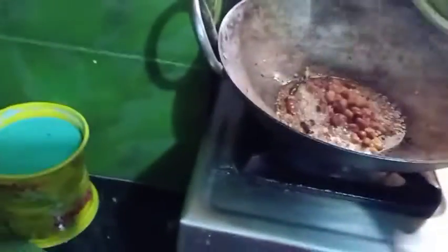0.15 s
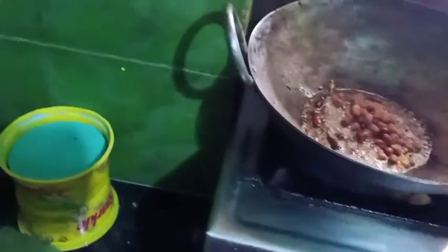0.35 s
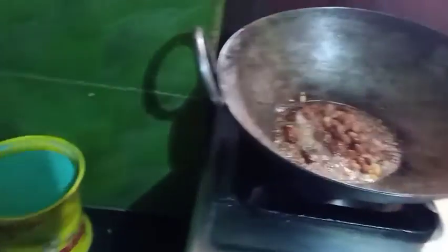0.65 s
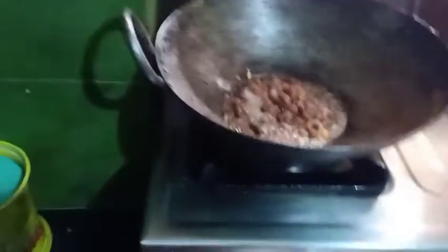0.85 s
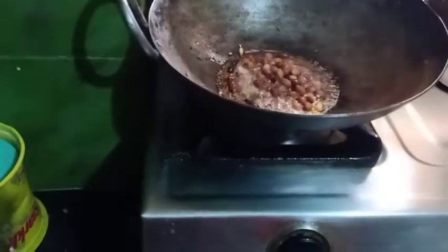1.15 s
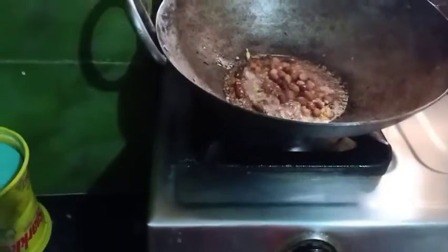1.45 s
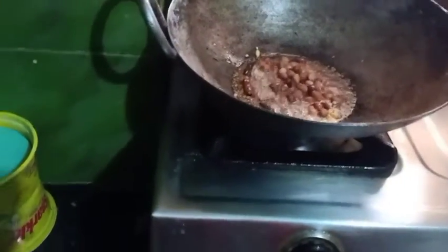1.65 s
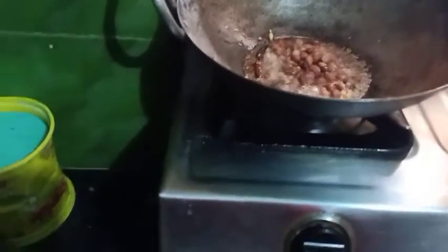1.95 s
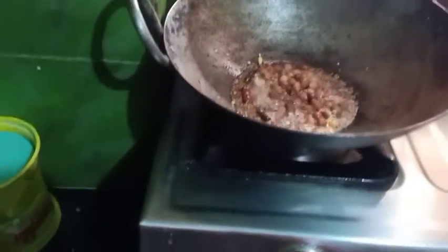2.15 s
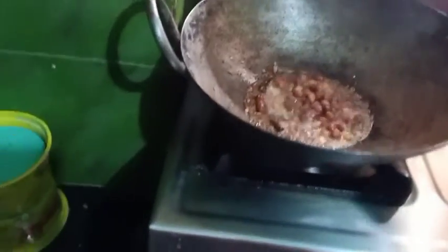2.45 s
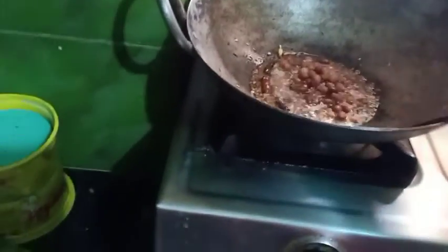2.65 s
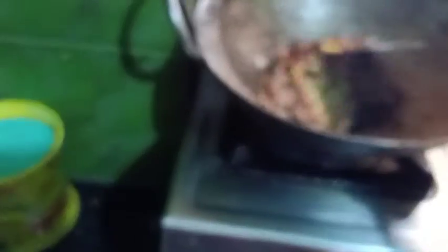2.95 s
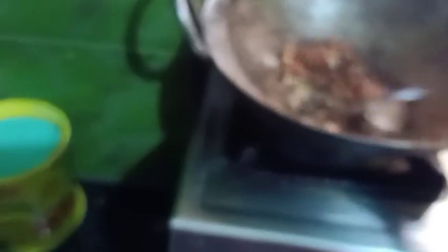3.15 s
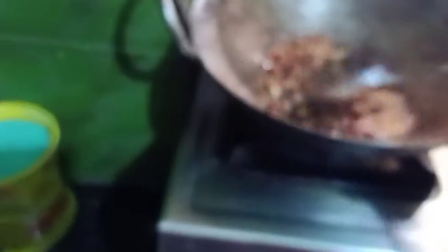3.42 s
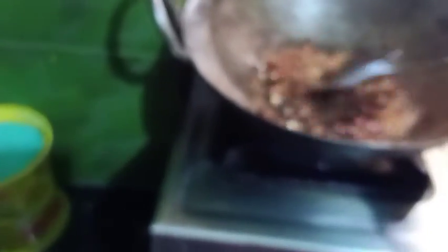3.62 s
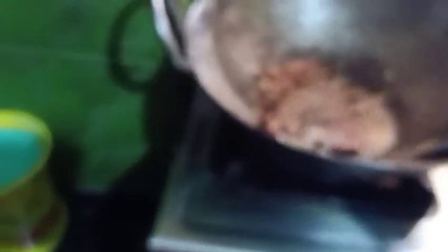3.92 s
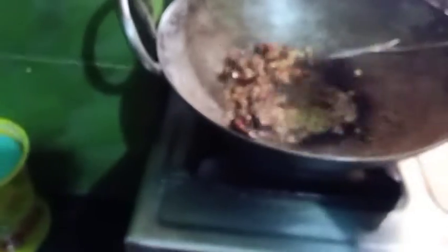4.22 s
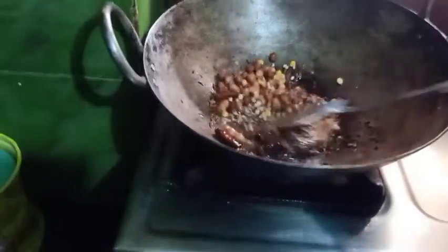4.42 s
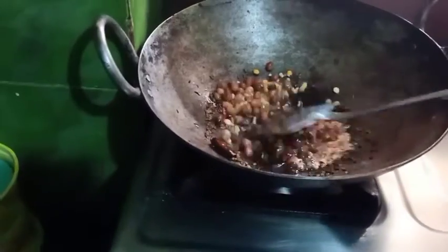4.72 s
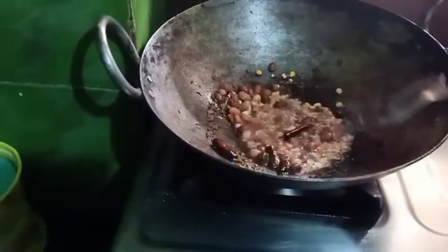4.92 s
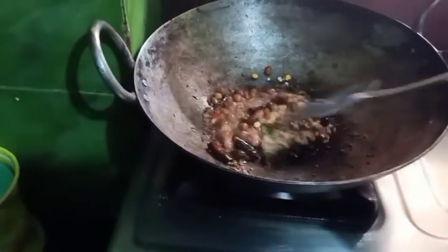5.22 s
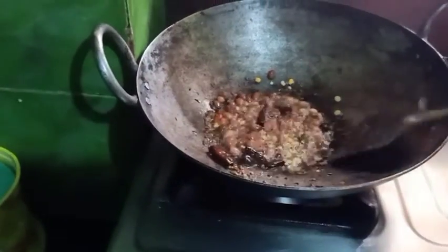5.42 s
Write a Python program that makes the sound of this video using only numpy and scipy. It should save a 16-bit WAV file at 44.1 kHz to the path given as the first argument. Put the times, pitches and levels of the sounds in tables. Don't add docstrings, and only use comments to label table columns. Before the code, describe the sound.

Steady fine sizzling and a low burner drone, with odd dry pops. About a second in, something metal drops on the counter and rattles to rest; the sizzle dips briefly. Then a steel blade taps the pan and turns the nuts, bringing bursts of hiss, dense crackling, hollow knocks and two late clanging strikes. Close stereo microphones, short hard room echo.

```python
import sys
import numpy as np
from scipy import signal
from scipy.fft import rfft, irfft, next_fast_len
from scipy.io import wavfile
from scipy.ndimage import uniform_filter1d, map_coordinates

SR = 44100
rng = np.random.default_rng(int(sys.argv[2]) if len(sys.argv) > 2 else 0)


def wav_record(signal):
    frames = np.transpose(np.atleast_2d(signal))
    bounded = np.clip(frames, -1, 1)
    quanta = np.round(bounded * 32767).astype(np.int16)
    wavfile.write(sys.argv[1], SR, quanta)


def nominal_scale(level):
    x = np.asarray(level, float) / 20
    return 10 ** x


N = 245637
BODY_HZ, SPRAY_HZ = 3520, 7920

# frequency_hz, density_db_per_hz
PORT = [(650, -36), (1100, -14), (1220, -8.5), (1360, -14.5), (1540, -12.5), (2220, -3.5), (2780, -5.5),
        (3210, -12), (4430, -8), (5420, 3.5), (5990, -2), (7570, -15), (10600, -21.5), (13700, -16.5),
        (15800, -26)]


def unit(x):
    return x / np.sqrt(np.mean(x ** 2) + 1e-20)


def along(points, hz):
    point_hz, value = np.transpose(points)
    return np.interp(np.log(hz + 1), np.log(point_hz + 1), value)


def curves(rows):
    s, *columns = np.transpose(rows)
    return [np.interp(np.arange(N) / SR, s, column) for column in columns]


def swells(rows):
    s, width, db = np.transpose(rows)[:, :, None]
    coarse = np.arange(0, N + 32, 32)
    level_db = np.sum(db * np.exp(-((coarse / SR - s) / width) ** 2), axis=0)
    return np.interp(np.arange(N), coarse, level_db)


def wobble(rate):
    coarse = np.arange(0, N + 32, 32)
    knots = rng.standard_normal(int(N * rate / SR) + 4)
    return np.interp(np.arange(N), coarse, map_coordinates(knots, [coarse * rate / SR]))


def filtered(x, response):
    size = next_fast_len(N + 8192)
    return irfft(rfft(x, size) * response(np.fft.rfftfreq(size, 1 / SR)), size)[..., :N]


def coloured(x, spectrum):
    magnitude = nominal_scale(along(spectrum, np.fft.rfftfreq(4096, 1 / SR)))
    cepstrum = irfft(np.log(magnitude + 1e-6))
    cepstrum[1:2048] *= 2
    cepstrum[2049:] = 0
    impulse = irfft(np.exp(rfft(cepstrum)))[:2048]
    return signal.fftconvolve(x, impulse[None] / np.linalg.norm(impulse), axes=1)[:, :N]


def bands(x):
    def passed(y, edge_hz, kind):
        return signal.sosfilt(signal.butter(4, edge_hz, kind, fs=SR, output="sos"), y)

    body = passed(x, BODY_HZ, "low")
    hiss = passed(passed(x, SPRAY_HZ, "low"), BODY_HZ, "high")
    return body, hiss, passed(x, SPRAY_HZ, "high")


def pair(a, b):
    # frequency_hz, likeness (0 to 1)
    alike = [(60, 0.81), (180, 0.96), (550, 0.65), (1650, 0.62), (4970, 0.11), (15000, 0.02)]

    def mid_and_side(hz):
        turn = np.arccos(np.clip(along(alike, hz), 0, 1)) / 2
        return np.array([np.cos(turn), np.sin(turn)])

    mid, side = filtered(np.array([a, b]), mid_and_side)
    return np.array([mid + side, mid - side])


def pair_noise(size):
    shared, left, right = rng.standard_normal((3, size))
    return shared + 0.46 * np.array([left, right])


def add(into, s, sound):
    at = round(s * SR)
    into[..., at:at + sound.shape[-1]] += sound[..., :N - at]


def ring(modes, t, bright_db):
    hz, db, t60 = np.transpose(modes)[:, :, None]
    level_luck, phase_luck = rng.standard_normal((2, 2, len(modes), 1))
    slow = uniform_filter1d(rng.standard_normal((len(modes), len(t))), size=200)
    flutter = 1 + 0.64 * unit(slow)
    level_db = db + 3 * level_luck + bright_db * (hz > BODY_HZ) - 60 * t / t60
    tone = np.sin(2 * np.pi * hz * t + hz / 3000 * phase_luck)
    attack = 1 - np.exp(-t / 0.0014)
    return np.sum(nominal_scale(level_db) * flutter * tone, axis=1) * attack


def glide(rows):
    out = np.zeros(N)
    for s, length, first_hz, last_hz, db in rows:
        size = round(length * SR)
        phase = 2 * np.pi * np.cumsum(np.linspace(first_hz, last_hz, size)) / SR
        add(out, s, nominal_scale(db) * np.hanning(size) ** 2 * np.sin(phase))
    return nominal_scale(wobble(79)) * out


def kitchen(x):
    # frequency_hz, t60_s
    room_decay = [(200, 0.45), (2000, 0.25), (6000, 0.35), (14000, 0.36)]
    hz, t, z = signal.stft(rng.standard_normal((2, SR // 3)), SR, nperseg=256)
    decay_db = -60 * t / along(room_decay, hz)[:, None]
    tail = signal.istft(z * nominal_scale(decay_db), SR, nperseg=256)[1]
    delayed = np.pad(x, ((0, 0), (250, 0)))
    return signal.fftconvolve(delayed, tail / np.linalg.norm(tail[0]), axes=1)[:, :N]


def patchy(x, patchy_db):
    z = signal.stft(x, nperseg=256)[2]
    field = uniform_filter1d(rng.standard_normal(z.shape[1:]), size=4, axis=0)
    field = uniform_filter1d(field, size=3, axis=1)
    return signal.istft(z * nominal_scale(patchy_db * unit(field)), nperseg=256)[1][:, :N]


def crackle(per_s, spread_db, bed_db):
    sizes = nominal_scale(spread_db * np.minimum(rng.exponential(size=(2, N)), 3))
    happens = rng.random((2, N)) < per_s / SR * nominal_scale(4 * wobble(25))
    middle, aside = happens * sizes * np.sign(rng.standard_normal((2, N)))
    both = unit(middle + 0.63 * np.array([aside, -np.roll(aside, 31)]))
    both[1] = np.roll(both[1], -3)
    bed = nominal_scale(bed_db) * rng.standard_normal((2, N))
    return coloured(patchy(both + 1.29 * kitchen(both) + bed, patchy_db=3.0), PORT)


def ducking():
    t = np.maximum(np.arange(N) / SR - 1.345, 0)
    fall_s, back_s = 0.056, 0.32
    return -8.5 * (1 - np.exp(-t / fall_s)) * np.exp(-t / back_s)


def frying():
    # time_s, sizzle_db, pressure_db
    boil = [(0.0, -52.5, 0.5), (0.43, -57, 1.5), (0.99, -55.5, 2.5), (1.23, -57, -6), (1.39, -57, 5),
            (1.7, -57.5, -3), (2.2, -56.5, 0), (2.76, -58.5, 0), (2.89, -48, 9), (2.97, -51, 3),
            (3.26, -44, 4), (3.54, -40, -0.5), (3.8, -41.5, -1.5), (4.11, -41, 0), (4.27, -43, -2),
            (4.72, -36.5, 2.5), (4.97, -40.5, -4.5), (5.57, -45.5, 1)]
    # centre_s, width_s, level_db
    surges = [(3.428, 0.0082, 0), (3.5, 0.014, -4), (3.548, 0.026, 5.5), (3.605, .012, -4),
              (3.65, 0.015, 3.5), (3.92, 0.028, 0.5), (4.03, 0.019, -1.5), (4.14, .03, 1.5),
              (4.28, .02, 0.5), (4.32, 0.011, 4.5), (4.385, 0.012, 0), (4.645, .012, -1),
              (4.712, 0.0083, 1), (4.735, 0.013, -4), (4.76, 0.0083, 6.5), (4.89, 0.012, 1),
              (5.03, 0.017, -4.5), (5.08, 0.0079, -13), (5.4, 0.017, 0)]
    # centre_s, width_s, level_db
    splashes = [
        (.76, 0.16, 4),
        (1.7, 0.035, 9.5),
        (3.36, 0.099, 6),
        (4.11, 0.04, 0),
        (4.54, 0.0097, 9),
        (4.93, 0.061, 4),
    ]
    # frequency_hz, density_db_per_hz
    drone_colour = [(82, -32.5), (140, -17.5), (172, 0), (204, -8.5), (237, 1.5), (339, -4.5), (434, 0.5),
                    (567, -5), (764, 2.5), (950, -3.5), (1500, -15), (1950, -44), (3300, -120)]
    # frequency_hz, density_db_per_hz
    hand_colour = [(15, -41), (25, -20), (64, 9), (140, 3), (180, -7), (310, -120)]

    sizzle_db, press_db = curves(boil)
    lively = sizzle_db + 55
    surge_db = swells(surges)

    body = unit(bands(crackle(per_s=500., spread_db=2.5, bed_db=-1.0))[0])
    _, hiss, spray = bands(crackle(per_s=700., spread_db=5.5, bed_db=-6.))
    scrape_db = -60 + 0.97 * lively + 0.57 * press_db
    spray_db = -69 + 1.14 * lively + swells(splashes) - 0.98 * surge_db + 0.73 + 2.1 * wobble(30)
    oil = nominal_scale(scrape_db) * body + nominal_scale(sizzle_db) * unit(hiss) + nominal_scale(spray_db) * unit(spray)
    oil *= nominal_scale(0.92 * wobble(11) + 0.47 * wobble(120) + surge_db + 2.0)

    hum = unit(filtered(rng.standard_normal(N), lambda hz: 1 / (1 + (2 * (hz - 750) / 14) ** 2)))
    hum_db = -72.5 + 0.79 * lively + 4.3 * wobble(18)

    drone = unit(coloured(pair(*rng.standard_normal((2, N))), drone_colour))
    drone_db = -62.5 + 0.29 * lively + press_db + 2.24 * wobble(17)

    hand = unit(coloured(pair(*rng.standard_normal((2, N))), hand_colour))
    hand_db = -77 + 0.099 * lively + swells([(0.87, 0.11, 14)])
    return nominal_scale(ducking()) * (oil + nominal_scale(hum_db) * hum + nominal_scale(drone_db) * drone + nominal_scale(hand_db) * hand)


def pops():
    # start_s, peak_db, weight_db
    dry_pops = [(0.0705, -30, -10), (0.1258, -26, -37), (0.1905, -30, -19), (0.2166, -24, -14),
                (0.2293, -36, -26), (0.312, -30.5, -27), (0.463, -31, -4), (0.5491, -16, 1),
                (0.7068, -53, -25), (0.9518, -23.5, -8), (1.7512, -35, 0), (1.8584, -25, -2),
                (1.9982, -43, 8), (2.0438, -40, 5), (2.0992, -29, -38), (2.18, -32, -22),
                (2.2217, -29, 3.8), (2.2898, -38, -17), (2.3395, -39, -18), (2.4204, -29.5, 2)]
    ticks = [(3.0543, -22, 1), (3.4212, -17, -17), (3.4652, -16.5, -2.5), (3.58, -25, 10.5),
             (3.9378, -23, 9.5), (3.725, -33, -13), (3.8, -31.5, 10.5), (3.828, -36, 16), (4.1684, -22, 0),
             (4.186, -18, -23), (4.3068, -25, -6), (4.3163, -21.5, -18), (4.3618, -23.5, 4),
             (4.455, -17, -7), (4.481, -21, 8), (4.7622, -19.5, 4), (4.7898, -18, -27), (4.9078, -20.5, 1),
             (4.9487, -25, 6), (5.0535, -18, -17), (5.0906, -22, 3), (5.175, -17, -5), (5.1885, -17.5, 1),
             (5.2208, -16, -5), (5.262, -20.5, -4), (5.2822, -18.5, -13)]
    spits = [(0.2695, -29.5, -2), (0.3582, -22.5, -13), (0.733, -37, -21), (1.4675, -37, -16),
             (1.9403, -29, -11), (2.5875, -39, -17), (2.9938, -30, 9.5), (3.2662, -35.5, 18.5),
             (3.3127, -26, -5), (3.355, -26, -4), (3.629, -18, -13), (3.6626, -23.5, 11.5),
             (3.9891, -13, -1), (4.2249, -19, -5), (4.2704, -27.5, 3), (4.525, -27, -8), (4.693, -23, 2),
             (5.3502, -25, 5)]
    vents = [
        (2.4605, -30.5, -9),
        (2.4865, -30, -4),
        (2.502, -24.5, -10.5),
        (2.6335, -38, -39),
    ]
    snaps = [(3.3474, -26.5, 1), (3.3994, -24.5, 2), (3.5434, -21, -8), (3.5504, -19, -8),
             (3.9444, -19.5, -14), (4.0094, -19, -8), (4.0934, -29.5, -16), (4.2544, -26, -1),
             (4.3794, -25, -8), (4.6194, -19, 2), (4.6724, -15.5, -4), (4.6824, -19, 1), (4.7084, -18, -4),
             (4.8004, -24, -8), (4.8274, -23, -10), (4.8664, -28, -10), (4.9613, -21, -3),
             (5.0644, -25, -2)]
    fizz = [
        (1.0215, -14.5, -20),
        (2.7133, -19, -7),
        (3.6185, -15.5, -21),
        (3.6934, -6, -23),
        (4.048, -14, -25),
        (4.664, -11, -12),
        (4.668, -7.5, -15),
        (2.501, -26, -8),
        (2.515, -32, -8),
        (2.53, -29, -10),
    ]
    # rows, spray dB, tail t60 s, snap strength
    kinds = [(dry_pops, -30, 0.089, 0.68), (ticks, -36, 0.12, 1), (spits, -17, 0.089, 0.97),
             (vents, -8.5, 0.18, 0.43), (snaps, -33, 0.049, 1.2), (fizz, -63, 0.053, 0.3)]

    parts, t = np.zeros((3, 2, N)), np.arange(SR // 8) / SR
    for rows, spray_db, t60, snap in kinds:
        for s, db, body_db in rows:
            burst = nominal_scale(-18.5 - 60 * t / t60) * rng.standard_normal((2, len(t)))
            burst += snap * nominal_scale(-12.5 - 60 * t / 0.0068) * rng.standard_normal(len(t))
            burst[:, 0] += snap
            burst[:, 300:] += .3 * burst[:, :-300]
            side = nominal_scale(1.03 * rng.standard_normal() * np.array([[1], [-1]]))
            part_db = db + np.array([body_db + 4.5, 3, spray_db + 20.5])
            add(parts, s, nominal_scale(part_db)[:, None, None] * side * burst)
    return sum(bands(coloured(part, PORT))[k] for k, part in enumerate(parts))


def pan_knocks():
    # start_s, peak_db, pitch_hz
    bowl = [(1.105, -54, 170), (1.56, -59, 197), (2.771, -45.5, 264), (2.789, -36.5, 264),
            (3.052, -41.5, 244.5), (3.46, -45.5, 263), (3.678, -43, 236), (3.711, -46.5, 280.5),
            (4.004, -43.5, 264), (4.045, -48, 284), (4.178, -46.5, 263.4), (4.381, -47, 270),
            (4.488, -50, 260), (4.621, -43, 238), (4.7, -41.5, 281), (4.78, -47.5, 248), (5.112, -41, 257),
            (5.431, -41.5, 260.5), (5.517, -49, 235)]
    # start_s, peak_db, pitch_hz
    rim = [(0.548, -41, 750), (2.765, -36.5, 737), (2.855, -34.5, 720), (3.052, -35, 754),
           (3.187, -41, 733), (3.618, -34.5, 730), (3.647, -34, 766), (3.664, -36.5, 513),
           (3.845, -44, 735), (3.936, -45, 750), (3.987, -42.5, 794), (4.195, -37.5, 763),
           (4.305, -37.5, 760), (4.377, -42.5, 714), (4.488, -35.5, 745), (4.619, -32, 754),
           (4.664, -37.5, 740), (4.708, -39, 820), (4.863, -41.5, 753), (5.109, -40, 805),
           (5.138, -28, 750), (5.427, -40, 930)]
    out, t = np.zeros((2, N)), np.arange(SR // 3) / SR
    attack = 1 - np.exp(-t / 0.00087)
    for rows, t60 in [(bowl, 0.26), (rim, 0.071)]:
        for s, db, hz in rows:
            rocking = 1 + 0.7 * unit(uniform_filter1d(rng.standard_normal(len(t)), size=250))
            tone = np.sin(2 * np.pi * hz * t)
            add(out, s, nominal_scale(db - 3.5 - 60 * t / t60) * rocking * tone * attack)
    return out


def clatter():
    # start_s, peak_db, brightness_db, dullness_db, t60_s
    bounces = [(1.111, -6.5, -16.5, -18.5, 0.074), (1.115, -14, -41, -36, 0.051),
               (1.136, -23.5, -31, -20, 0.12), (1.189, -30, -13, -15, 0.19),
               (1.24, -30, -15.5, -19.5, 0.23), (1.267, -15.5, -23, -18.5, 0.083),
               (1.286, -29, -8, -49, 0.18), (1.329, -23.5, -16, -15, 0.15),
               (1.359, -19.5, -13.5, -43, 0.094), (1.374, -31.5, -32, -16.5, 0.21),
               (1.409, -41, -30, -11, 0.081)]
    # pitch_hz, level_db, t60_s
    falling = [(625, -16.5, 0.12), (935, -4.5, 0.08), (1030, -8.5, 0.064), (1605, -13, 0.12),
               (2340, -4, 0.14), (2542, -1, 0.097), (2820, -8, 0.11), (2990, -9, 0.062), (5400, -4.5, 0.1)]
    # pitch_hz, level_db, t60_s
    rolling = [(630, -16, 0.19), (1016, -10.5, 0.2), (1660, 2, .06), (1910, -1, 0.083), (2235, -1.5, 0.15),
               (2590, -2, .12), (2840, -8.5, .15), (4380, -22, 0.091), (5250, 0, .06)]
    # frequency_hz, density_db_per_hz
    counter = [(71, -75), (120, -50), (494, -16.5), (569, -23.5), (1000, -3), (1380, -7.5), (1630, -1.5),
               (2110, 1.5), (2290, 1.5), (3230, -16), (5250, -15.5), (11100, -69), (15000, -54)]

    parts, rings, t = np.zeros((3, 2, N)), np.zeros((2, N)), np.arange(SR // 3) / SR
    for s, db, bright_db, dull_db, t60 in bounces:
        crack = nominal_scale(db - 5.0 - 60 * t / t60) * pair_noise(len(t))
        part_db = np.array([.3, bright_db + 17.0, dull_db + 19])
        add(parts, s, nominal_scale(part_db)[:, None, None] * crack)
        modes = falling if s < 1.25 else rolling
        add(rings, s, nominal_scale(db - 12.5) * ring(modes, t, bright_db + 11))
    body, bright, dull = (coloured(part, counter) for part in parts)

    def split(x, kind):
        return signal.sosfilt(signal.butter(3, 1450, kind, fs=SR, output="sos"), x)

    whole = split(bands(body)[0], "high") + sum(bands(bright)[1:]) + rings
    whole[1] = np.roll(whole[1], 8)
    return whole * nominal_scale([[1.5], [-1.5]]) + split(dull, "low")


def steam_whistle():
    # start_s, length_s, first_hz, last_hz, peak_db
    jets = [
        (2.515, 0.047, 13300, 13450, -46),
        (2.515, 0.15, 13900, 14000, -56),
    ]
    return glide(jets)


def spatula():
    # start_s, peak_db, brightness_db
    blows = [
        (2.766, -26, 4),
        (2.771, -29.5, 2),
        (2.778, -25, 5),
        (2.788, -32.5, 1),
        (3.054, -43.5, 14),
        (5.11, -24, -3),
        (5.117, -18, -7),
        (5.128, -23, -12),
        (5.426, -13.5, -1.5),
        (5.431, -8, 1.5),
    ]
    # pitch_hz, level_db, t60_s
    flat = [(2054, -2, 0.043), (2618, 2.5, 0.13), (3050, -8, 0.062), (4130, -18, 0.4), (5200, -5, .07),
            (5410, -5, .08), (5760, -2.5, 0.084), (5900, -8, 0.098), (6772, -8, 0.086), (7400, -13, .06)]
    # pitch_hz, level_db, t60_s
    lifted = [(2110, -26, 0.25), (2252, -1.5, 0.039), (2626, -2, 0.13), (4059, -15, 0.13),
              (4160, -11, 0.09), (5146, 1.5, 0.049), (5760, -7, 0.1), (6240, -2.5, 0.049),
              (6560, -8, 0.052), (7160, -8.5, 0.06), (7908, -24, .06), (9400, -18, 0.063),
              (11530, -25, 0.05)]
    cracks, rings, t = *np.zeros((2, 2, N)), np.arange(SR // 3) / SR
    for s, db, bright_db in blows:
        add(cracks, s, nominal_scale(db + bright_db - 16.5 - 60 * t / 0.082) * pair_noise(len(t)))
        modes = flat if s < 4 else lifted
        add(rings, s, nominal_scale(db - 11.5) * ring(modes, t, bright_db) * nominal_scale([[2.5], [-2.5]]))
    return coloured(cracks, PORT) + rings


def groan():
    # start_s, length_s, first_hz, last_hz, peak_db
    drags = [
        (3.49, 0.066, 802, 866, -46),
        (3.515, 0.063, 863, 686, -40.5),
        (3.57, 0.1, 700, 730, -48),
    ]
    return glide(drags)


def scene():
    hits = pops() + pan_knocks() + clatter() + spatula() + groan()
    left, right = nominal_scale(-8.0) * kitchen(hits)
    side = filtered(left - right, lambda hz: 1 / (1 + (900 / (hz + 1)) ** 2))
    room = np.array([left + right + side, left + right - side]) / 2
    return frying() + hits + room + steam_whistle()


def top_cut(x):
    return signal.sosfilt(signal.butter(12, 16450, fs=SR, output="sos"), x)


def record(dry):
    # frequency_hz, level_db
    lean = [(60, -1), (130, 1), (290, -1.5), (640, 1), (1410, 4), (3100, 6), (6820, 6), (15000, -4)]

    def response(hz):
        colour = nominal_scale(np.array([[.5], [-.5]]) * along(lean, hz))
        return colour * (hz < 15830) / (1 + (45 / (hz + 1)) ** 3)

    ports = filtered(dry, response)
    rounded = ports / (1 + np.abs(ports / 0.99) ** 4) ** 0.23
    return top_cut(rounded)


dry = scene()
out = record(dry)
wav_record(out)
```